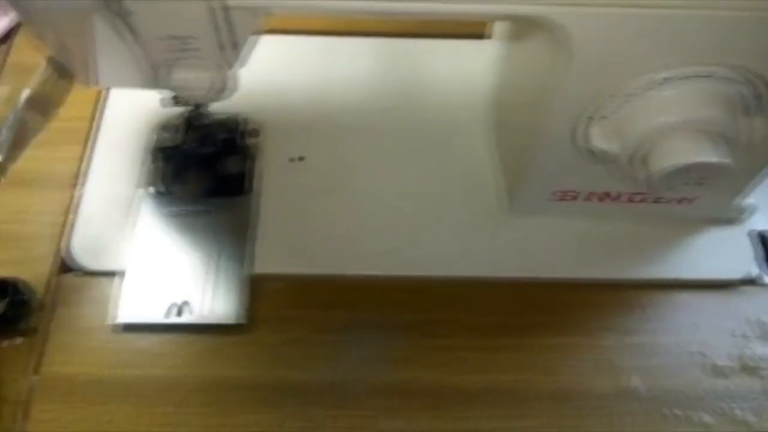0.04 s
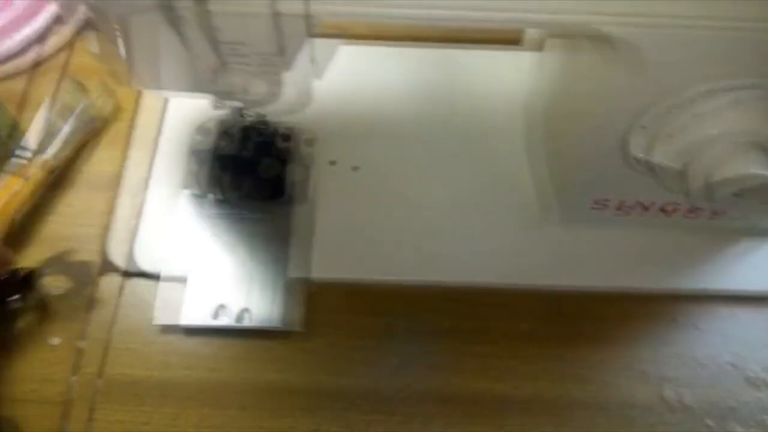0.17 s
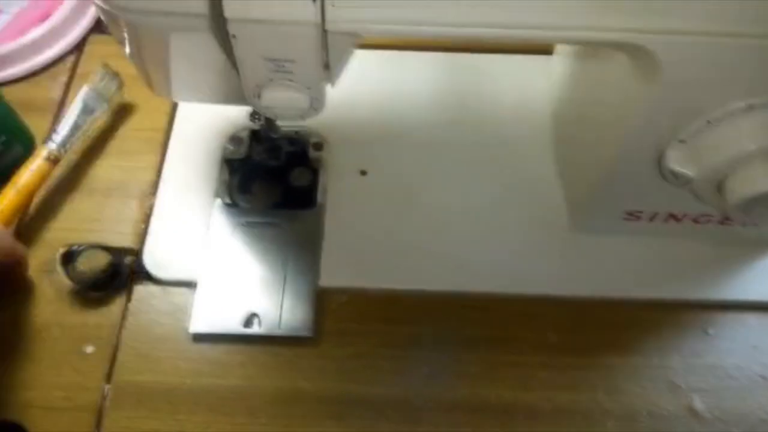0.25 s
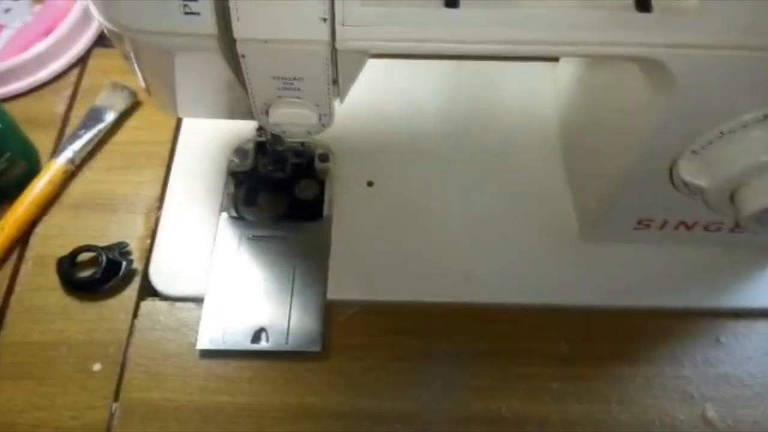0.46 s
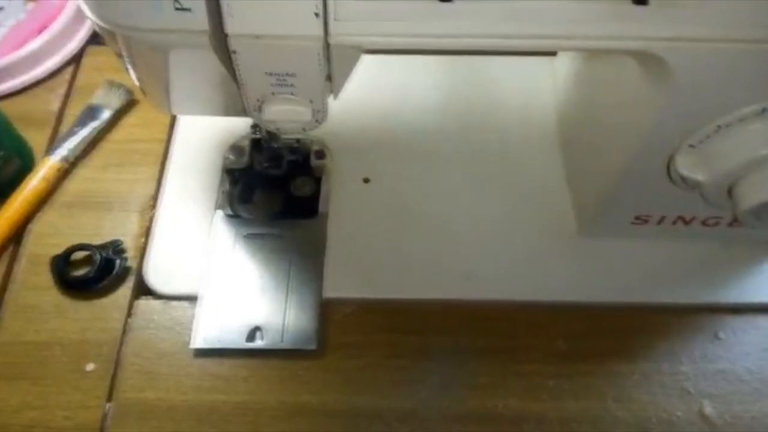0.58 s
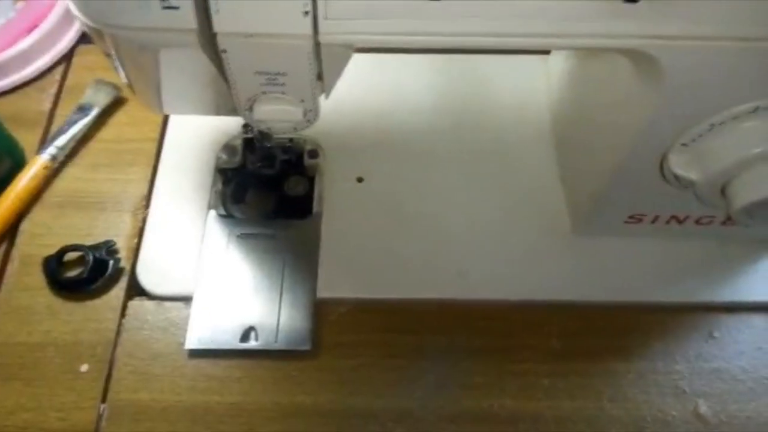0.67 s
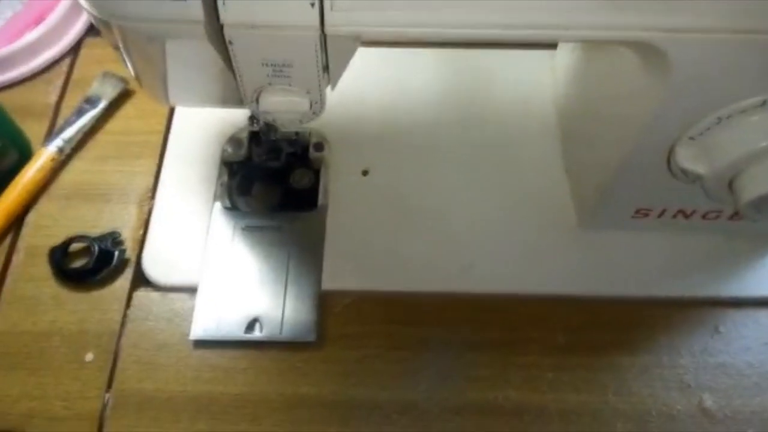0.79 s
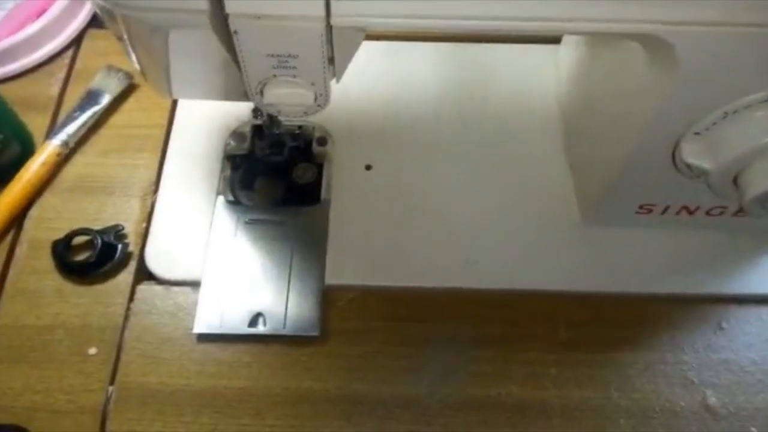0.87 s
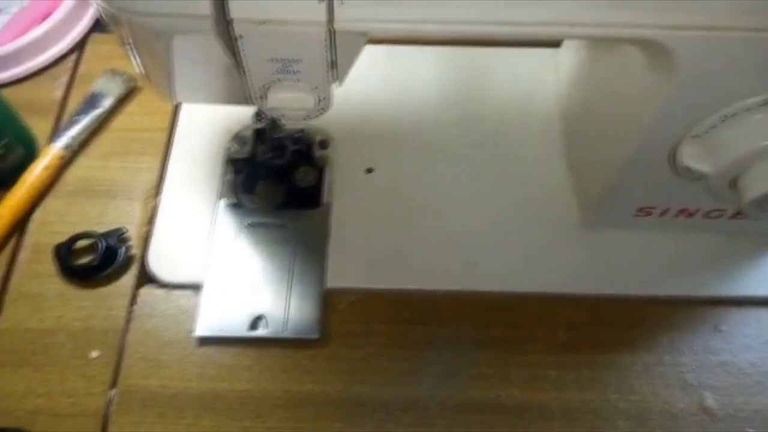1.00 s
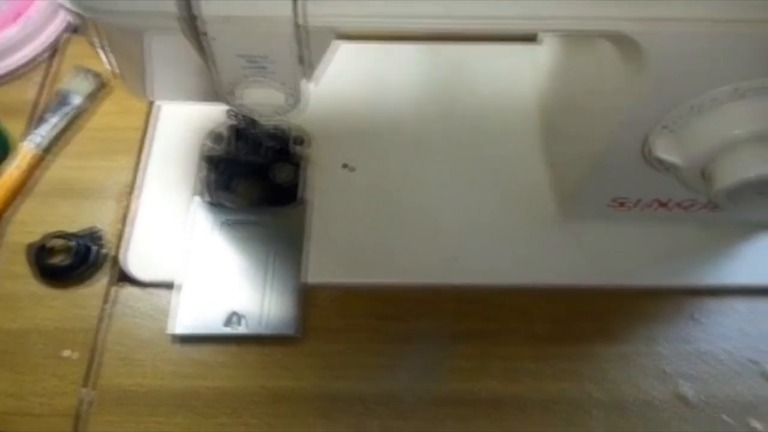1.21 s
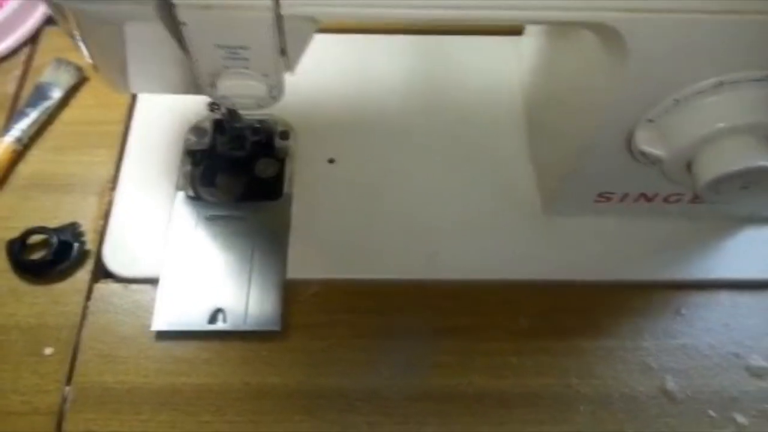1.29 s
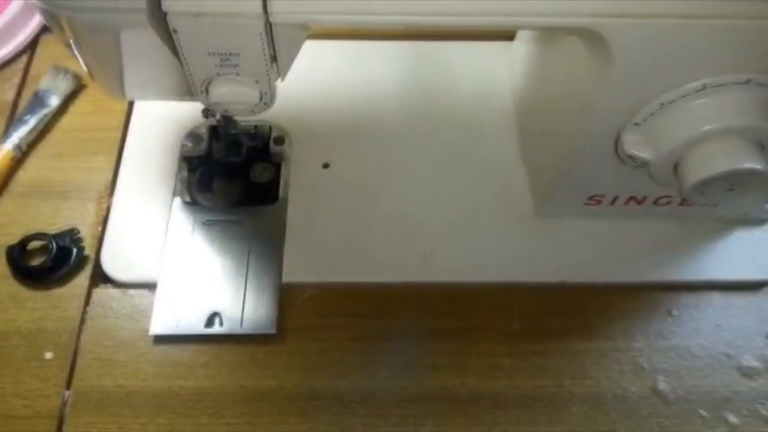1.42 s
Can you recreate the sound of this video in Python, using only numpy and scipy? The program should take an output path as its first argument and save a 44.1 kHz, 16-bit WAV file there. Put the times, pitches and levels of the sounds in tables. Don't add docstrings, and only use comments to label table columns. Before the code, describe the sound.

Small hard metal object put down on wood: one double click, then a dense run of bright knocks with gritty dragging, a short gap and a weakening, rapid rattle, indoors with quiet room tone and a narrow phone sound.

```python
import sys
import numpy as np
from scipy import signal
from scipy.io import wavfile

SR = 44100
rng = np.random.default_rng(int(sys.argv[2]) if len(sys.argv) > 2 else 0)


def gain_from_db(level_db):
    decades = np.asarray(level_db, float) / 20
    return 10 ** decades


def pcm_store(signal):
    levels = np.round(np.clip(np.atleast_2d(signal), -1, 1) * 32767)
    wavfile.write(sys.argv[1], SR, levels.astype(np.int16).T)


N = 63945

# f/Hz, correlation/1
LIKENESS = [(60, 0.89), (500, -0.85), (1000, 0.71), (8000, -1.1), (14000, 0.37)]
# f/Hz, level/dB, T60/s
WOOD_MODES = [(325.6, -13.5, .09), (560, -40, 0.01), (699.7, -3.5, 0.22), (791, -6, 0.064),
              (860.5, 5.5, 0.028), (1152.6, 5.5, 0.072), (1260, 2.9, 0.1), (1435, -14, 0.082)]
# f/Hz, level/dB, T60/s
CASE_MODES = [(1600, -5, 0.007), (1830, -10.5, 0.026), (2097, 1, 0.047), (2488, 8, 0.0051),
              (2753, 0.5, 0.0151), (3180, -2.5, .012), (3400, -0.5, 0.021), (3710, -1.5, 0.013),
              (3910, -8, 0.0116)]
# f/Hz, level/dB, T60/s
RING_MODES = [(4367, 2, 0.0048), (4650, -2.5, 0.0097), (5216, 7, 0.01), (5647, 3.5, 0.02),
              (6027, -8.3, 0.016), (6400, -25.5, 0.0048)]
# f/Hz, level/dB, T60/s
TOP_MODES = [(14700, -16, 0.037), (15000, -10, 0.073), (15240, 11, 0.017), (15700, -3.5, .02)]
# f/Hz, level/dB, T60/s
RATTLE_LOW_MODES = [(1790, -20, 0.015), (2200, 8.5, 0.024), (2360, 22, 0.015), (2780, 10, 0.018),
                    (3260, -6, 0.0074)]
# f/Hz, level/dB, T60/s
RATTLE_HIGH_MODES = [(3600, -23, 0.0041), (4050, 3.5, 0.015), (4530, 3.5, 0.0084), (4950, 6.5, 0.016),
                     (5320, 9, 0.018), (5900, -11, 0.021), (6470, -27, .01), (6300, -29, .008)]


def at_hz(points, hz):
    table_hz, value = np.array(points)[:, 0], np.array(points)[:, 1]
    return np.interp(np.log(hz), np.log(table_hz), value)


def rms_one(x):
    return x / np.sqrt(np.mean(x ** 2) + 1e-20)


def top_one(x):
    return x / np.abs(x).max(axis=(1, 2), keepdims=True)


def bandpass(x, low_hz, high_hz, order=4):
    return signal.sosfilt(signal.butter(order, [low_hz, high_hz], "band", fs=SR, output="sos"), x)


def ring(x, hz, t60):
    radius = gain_from_db(-60 / (t60 * SR))
    angle = 2 * np.pi * hz / SR
    return signal.lfilter([0, np.sin(angle)], [1, -2 * radius * np.cos(angle), radius ** 2], x + 1e-18)


def bands():
    edges_hz = 30 * 2 ** np.arange(0, 9.4, 2 / 3)
    return [(np.sqrt(a * b), a, b) for a, b in zip(edges_hz, edges_hz[1:])]


def diffuse_pair(mid, side, hz):
    alike = np.clip(at_hz(LIKENESS, hz), -1, 1)
    return np.sqrt(1 + alike) * mid + np.sqrt(1 - alike) * side * [[1], [-1]]


def room_tone():
    # f/Hz, level/dB
    tone_spectrum = [(30, -15), (50, -19), (80, -15), (250, 1.5), (900, 3), (5500, -4.5), (7400, -56),
                     (16000, -19.5)]
    white, tone = rng.standard_normal((2, 2, N)), 0
    for k, (hz, low_hz, high_hz) in enumerate(bands()):
        mid, side = bandpass(white[k % 2], low_hz, high_hz, 2)
        tone = tone + gain_from_db(at_hz(tone_spectrum, hz)) * diffuse_pair(mid, side, hz)
    peak = rms_one(ring(rng.standard_normal((2, N)), 5490, 0.003))
    hiss = rms_one(ring(rng.standard_normal((2, N)), 15300, 0.0024))
    return gain_from_db(-66.5) * rms_one(tone) + gain_from_db(-68.5) * peak + gain_from_db(-80.5) * hiss


def far_hoot():
    start_s, length_s, hz, level_db = 0.88, 0.17, 715, -70
    swell = np.sin(np.pi * np.clip((np.arange(N) / SR - start_s) / length_s, 0, 1))
    return rms_one(ring(rng.standard_normal(N), hz, 0.12)) * swell * gain_from_db(level_db)


def room(x):
    # f/Hz, T60/s
    decay_times = [(250, .5), (700, 0.57), (2000, 0.35), (4000, 0.5), (6000, 0.0967), (15000, 1.6)]
    # f/Hz, level/dB
    tail_levels = [(250, 1), (700, -4.5), (2000, -2), (4000, -2.5), (6000, -1), (15000, -21.5)]
    delay_s = 0.005
    t = np.arange(N // 3) / SR
    white, tail = rng.standard_normal((2, 2, N // 3)), 0
    for k, (hz, low_hz, high_hz) in enumerate(bands()):
        fade = gain_from_db(-60 * t / at_hz(decay_times, hz)) * np.clip(t / delay_s - 1, 0, 1)
        mid, side = bandpass(white[k % 2], low_hz, high_hz, 2) * fade / np.sqrt(2 * np.sum(fade ** 2))
        tail = tail + gain_from_db(at_hz(tail_levels, hz)) * diffuse_pair(mid, side, hz)
    tail = tail * np.clip(4 * (1 - t / t[-1]), 0, 1) ** 2
    return signal.fftconvolve(x[None], tail, axes=1)[:, :N]


def pair(x, modes):
    own = 0.74 if 1400 < modes[-1][0] * 0.9 < 9000 else 0.6
    return np.sqrt(1 - own) * x[..., :1, :] + np.sqrt(own) * x[..., 1:, :]


def confine(x, modes):
    spare_hz = min(0.2 * modes[0][0], 700)
    return bandpass(x, modes[0][0] - spare_hz, modes[-1][0] + spare_hz)


def strike(times, peaks_db, modes, rise_s, fall_s):
    mode_spread_db, crack_db, crack_t60_s = 5, -34, 0.0025
    t = np.arange(3072) / SR
    force = (1 - np.exp(-t / rise_s)) ** 2 * np.exp(-t / fall_s)
    bursts = pair(rng.standard_normal((len(times), 3, len(t))), modes) * force
    spread = gain_from_db(mode_spread_db * rng.standard_normal((len(modes), len(times), 1, 1)))
    hits = 0
    for k, (hz, db, t60) in enumerate(modes):
        crack = gain_from_db(crack_db) * ring(bursts, hz, crack_t60_s)
        hits = hits + gain_from_db(db) * spread[k] * top_one(ring(bursts, hz, t60) + crack)
    fade = np.cos(np.pi / 2 * t / t[-1])
    hits = top_one(confine(hits, modes)) * gain_from_db(peaks_db)[:, None, None] * fade
    out = np.zeros((2, N + len(t)))
    for s, hit in zip(times, hits):
        i = int((s - rise_s) * SR)
        out[:, i:i + len(t)] += hit
    return out[:, :N]


def rub(curve, parts):
    grains_per_s, grain_spread_db, damping = 4000, 3, 0.2
    s, db = np.transpose(curve)
    sizes = gain_from_db(grain_spread_db * np.minimum(rng.exponential(1, (3, N)), 5))
    sizes = sizes * rng.choice([-1, 1], (3, N))
    grains = sizes * (rng.random((3, N)) < grains_per_s / SR)
    out = 0
    for modes, part_db in parts:
        force = pair(grains, modes)
        rung = sum(gain_from_db(mode_db) * ring(force, hz, t60 * damping) for hz, mode_db, t60 in modes)
        out = out + gain_from_db(part_db) * rms_one(confine(rung, modes))
    return out * gain_from_db(np.interp(np.arange(N) / SR, s, db, -200, -200))


def rattle():
    # t/s, peak level/dB, lower modes relative level/dB
    tick_events = [(1.1401, -40.5, -22), (1.1452, -34.5, -8), (1.151, -23, -14.5), (1.157, -25.5, -26),
                   (1.1643, -28.5, -11), (1.1702, -19, -23), (1.176, -30, -37), (1.1825, -26, -32),
                   (1.1979, -24, -35), (1.204, -31, -29), (1.213, -27, -23), (1.2312, -30, -23),
                   (1.2478, -36, -12), (1.257, -35.5, -17.5), (1.267, -33, -28), (1.281, -40, -2)]
    # f/Hz, level/dB, T60/s
    body_modes = [(464, -9, 0.01), (687, -2.5, 0.037), (1090, -4.5, 0.034)]
    # t/s, level/dB
    shiver_curve = [
        (1.137, -98),
        (1.142, -46),
        (1.19, -45.5),
        (1.25, -49),
        (1.29, -62),
        (1.33, -86),
    ]
    s, db, low_db = np.transpose(tick_events)
    parts = [(db, RATTLE_HIGH_MODES), (db + low_db + 3.5, RATTLE_LOW_MODES), (db - 29, body_modes)]
    ticks = sum(strike(s - 0.0012, peaks, modes, 0.00081, 0.0011) for peaks, modes in parts)
    return ticks + rub(shiver_curve, [(RATTLE_HIGH_MODES, -3), (RATTLE_LOW_MODES, -4)])


def scrape():
    # t/s, level/dB
    pressure_curve = [
        (.395, -110),
        (.406, -49.5),
        (.47, -45),
        (.51, -41),
        (.54, -33),
        (.57, -32),
        (.63, -35),
        (.65, -31.5),
        (.68, -98),
    ]
    low = rub(pressure_curve, [(WOOD_MODES, -6.5), (CASE_MODES, -2.5), (RING_MODES, -1.5)])
    return low, rub(pressure_curve, [(TOP_MODES, -40.5)])


def knocks():
    # t/s, case peak level/dB, wood peak level/dB, 5 kHz ring peak level/dB, 15 kHz peak level/dB
    knock_events = [(0.2278, -45, -44.5, -43, -85), (0.2475, -19.5, -28, -14, -31),
                    (0.2519, -16.5, -23.5, -17, -52), (0.407, -28.5, -48, -42, -75),
                    (.4134, -29.5, -31, -58, -84.5), (0.4365, -24, -25, -16.5, -24),
                    (.4544, -24.5, -30, -38.5, -44.5), (0.4701, -17.5, -37.5, -20.5, -56.5),
                    (0.4929, -17, -27, -4.5, -30), (0.5146, -15, -44.5, -11, -34.5),
                    (0.5213, -10.5, -24.5, -4.5, -31.5), (0.529, -21.5, -48.5, -10.5, -52),
                    (0.5441, -26.5, -27.5, -14, -47), (0.5599, -37, -32.5, -10.5, -61),
                    (.5790, -22.5, -27, -15, -48.5), (0.5917, -12, -22, -14, -61),
                    (0.5978, -21, -30, -16, -63), (0.6068, -20.5, -32.5, -10.5, -58),
                    (0.6228, -16, -27, -13.5, -75)]
    rise_s, fall_s = 0.0024, 0.0018
    s, case_db, wood_db, bright_db, top_db = np.transpose(knock_events)
    low = strike(s, case_db, CASE_MODES, rise_s, fall_s)
    low = low + strike(s, wood_db, WOOD_MODES, rise_s, fall_s)
    low = low + strike(s, bright_db, RING_MODES, rise_s, fall_s)
    top = strike(s, top_db, TOP_MODES, rise_s, fall_s)
    thump = strike(s, case_db - 48, [(45, 0, 0.05), (150, -3, 0.05)], 0.0012, 0.0071).mean(0)
    return low, top, thump


def microphone_leak(low):
    noise = bandpass(rng.standard_normal((2, N)), 8800, 12600)
    return gain_from_db(-38.5) * 9 * np.abs(low) ** 1.48 * noise


def microphones(low):
    lag_s = 0.00036
    low = signal.sosfilt(signal.butter(12, 7020, fs=SR, output="sos"), low)
    low = signal.sosfilt(signal.butter(4, 324, "high", fs=SR, output="sos"), low)
    low[0] = np.roll(low[0], int(lag_s * SR))
    return low


def scene():
    knock_low, knock_top, thump = knocks()
    scrape_low, scrape_top = scrape()
    contact = knock_low + scrape_low
    low = microphones(contact + rattle())
    direct = low + knock_top + scrape_top + microphone_leak(contact)
    balance = gain_from_db(np.array([[0.6], [-0.6]]))
    return direct * balance + room(low.mean(0)) + thump + room_tone() + far_hoot()


def band_limit(x):
    return signal.sosfilt(signal.butter(12, 16640, fs=SR, output="sos"), x)


def record(dry):
    mix = signal.sosfilt(signal.cheby2(10, 50, 16700, fs=SR, output="sos"), dry)
    return band_limit(mix)


dry = scene()
out = record(dry)
pcm_store(out)
```